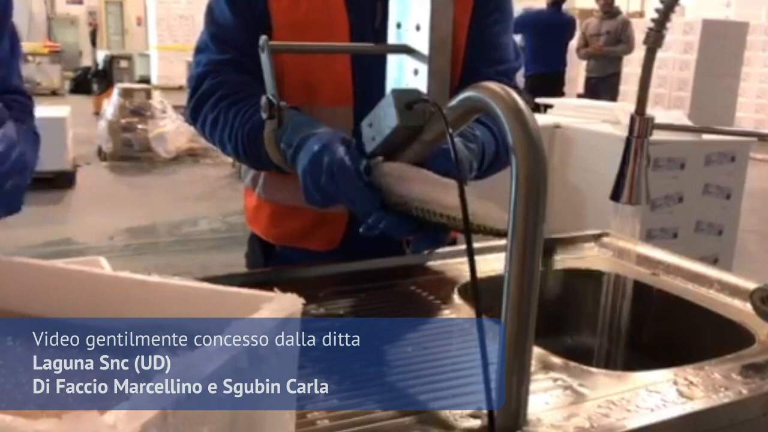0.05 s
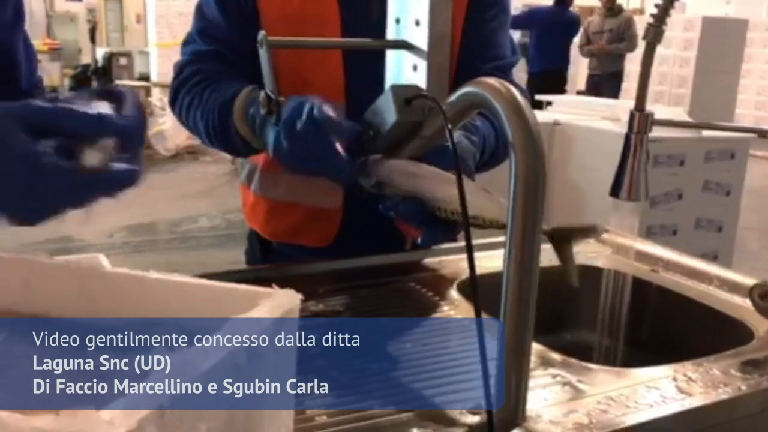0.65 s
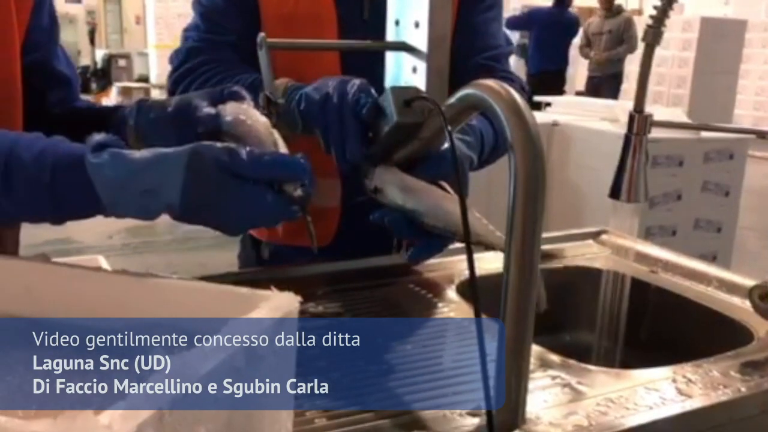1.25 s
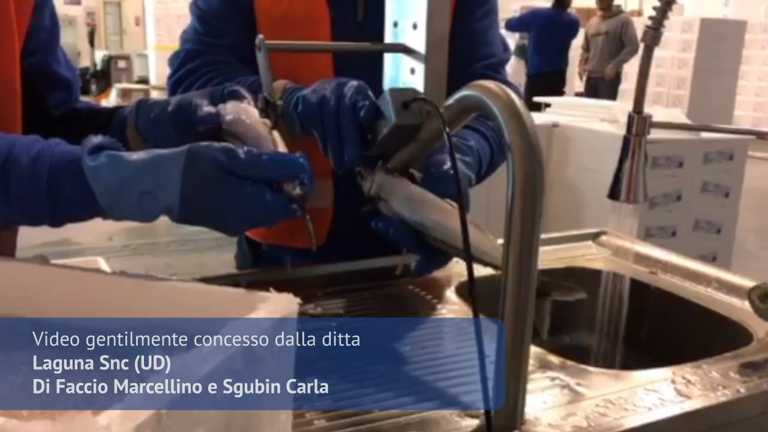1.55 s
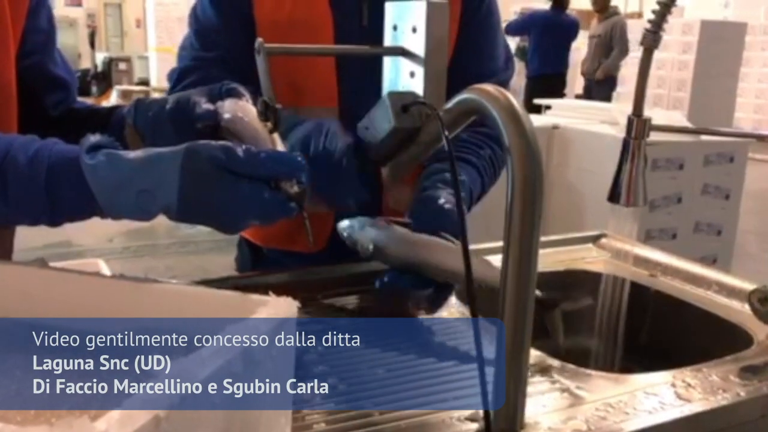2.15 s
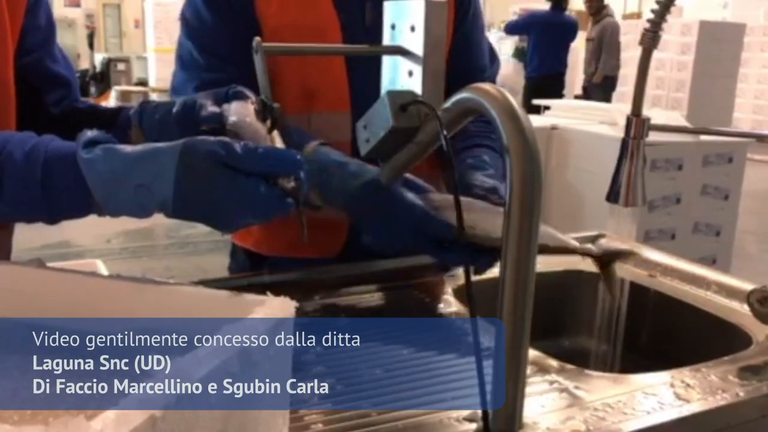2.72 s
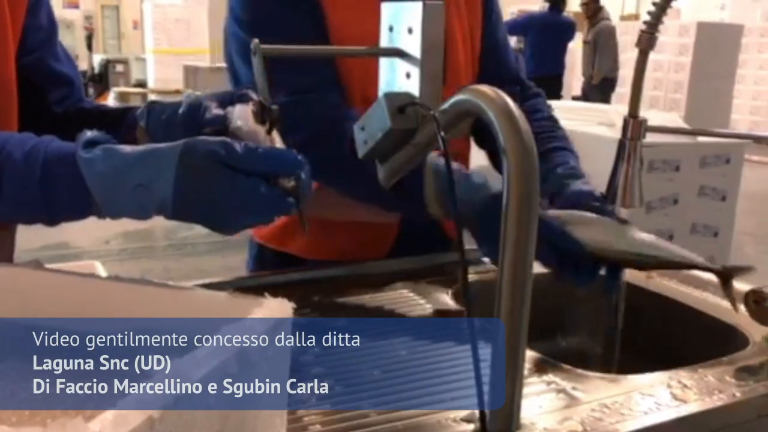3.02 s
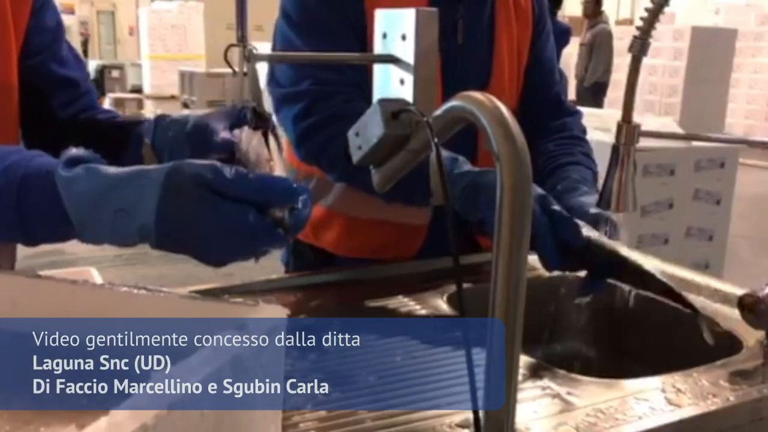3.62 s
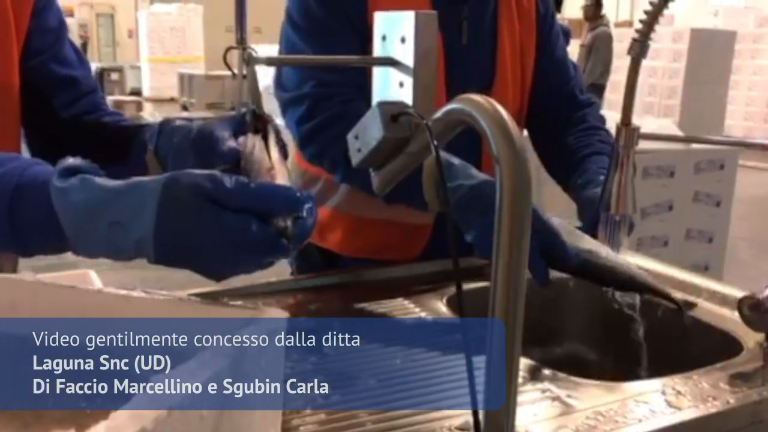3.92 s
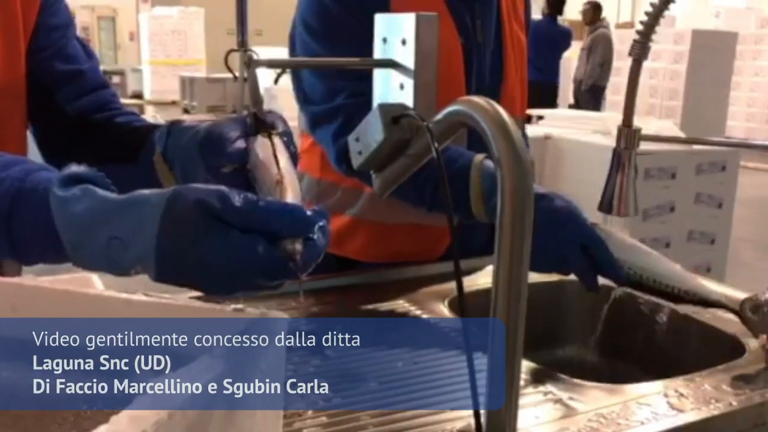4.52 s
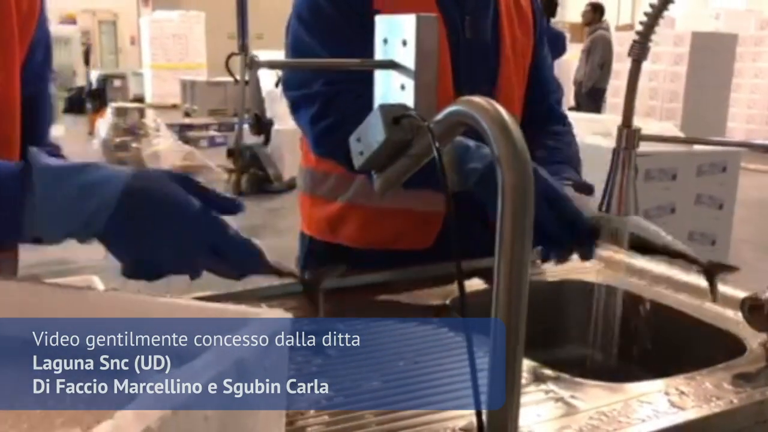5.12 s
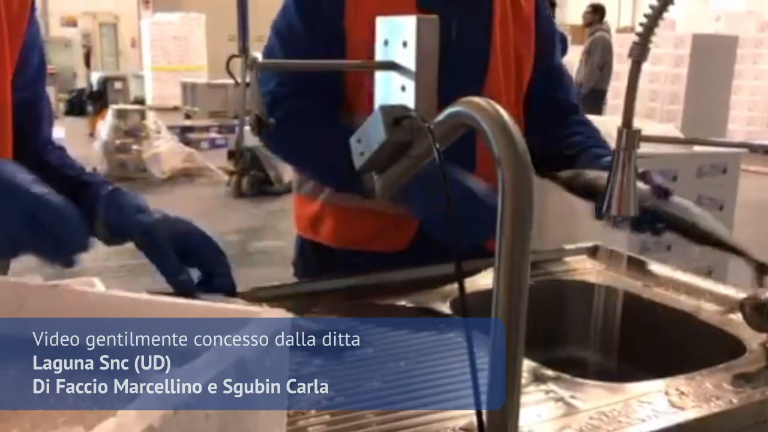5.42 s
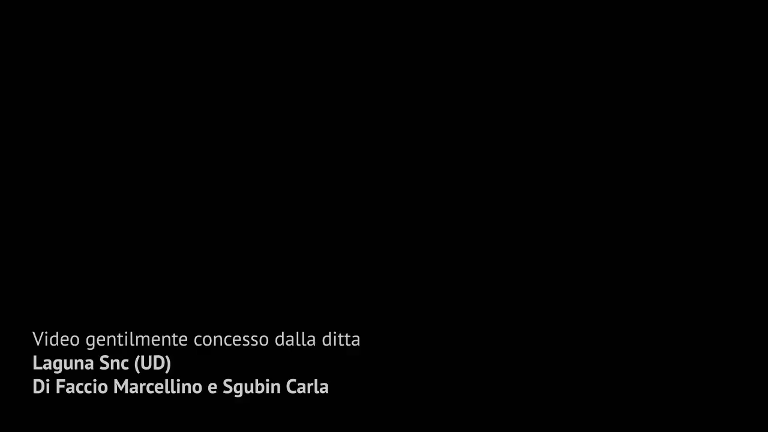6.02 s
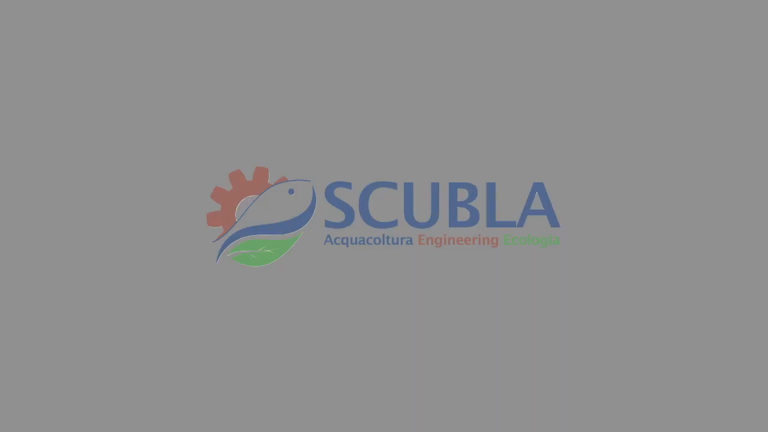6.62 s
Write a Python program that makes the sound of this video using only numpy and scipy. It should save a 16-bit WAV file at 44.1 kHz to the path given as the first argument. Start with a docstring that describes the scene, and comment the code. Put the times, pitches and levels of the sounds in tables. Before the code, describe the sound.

A suction machine slurps and gurgles as it pulls the guts from a fish, with small wet snaps over a motor hum. The pipe blocks and air squeals briefly, then it clears with a wet pop and a knock. The machine settles into a steady whine over rushing air while tap water splashes and fades. Near the end a fish thuds softly on a steel bench, all heard nearby in a droning workshop.

```python
"""A vacuum fish-gutting machine

At a steel sink in a droning workshop, a nozzle slurps the guts out of a fish until a plug of them
blocks the pipe: air squeals past it and the unloaded turbine speeds up. The plug clears with a wet pop,
the turbine settles to a whine over rushing air and a running tap, and another fish thuds on the bench."""
import sys
import numpy as np
from scipy import signal
from scipy.fft import rfft, irfft, next_fast_len
from scipy.io import wavfile
from scipy.ndimage import uniform_filter1d, map_coordinates

SR = 44100
rng = np.random.default_rng(int(sys.argv[2]) if len(sys.argv) > 2 else 0)


def master(y):
    """Save y as 16-bit WAV."""
    cut = np.clip(np.atleast_2d(y).T, -1, 1)
    pcm = np.round(cut * 32767)  # scale
    wavfile.write(sys.argv[1], SR, pcm.astype(np.int16))


N = 298116

# Spectrum of the workshop drone: f/Hz, relative density/dB
DRONE_SPECTRUM = [(25, -33.5), (50, -9.5), (100, -9.5), (135, -7.5), (215, -0.5), (300, 2), (430, -5),
                  (620, -3), (1200, -8), (3000, -4.5), (8000, -30)]
# Reverberation time of the workshop: f/Hz, T60/s
ROOM_T60 = [(60, 0.38), (150, 1), (1000, 0.48), (10000, 0.077)]
# Soft, heavy blows on the steel bench: t/s, level/dB
THUDS = [(2.135, -24), (5.468, -23.5)]
# Modes of the bench: f/Hz, relative level/dB, T60/s, swell time/s
BENCH_MODES = [(72, -7, .12, .045), (199.2, 1.5, 0.19, .018), (256, -3, 0.2, .03)]
# Spectrum of the rushing air: f/Hz, relative density/dB
AIR_SPECTRUM = [(250, -16.5), (450, -9.5), (900, 2.5), (1500, 0.5), (2300, -5.5), (4600, 2.5), (5700, 1),
                (6300, -2.5), (7800, -7.5), (9000, -5.5), (10000, -7), (11400, -6.5), (13000, -7),
                (15800, -11)]
# Resonances of the suction pipe: f/Hz, bandwidth/Hz, relative level/dB
PIPE_MODES = [(604, 47, -1), (1053, 98, -3), (2910, 690, -16.5), (3123, 94, -3), (3955, 450, -8),
              (4470, 130, -4), (5404, 150, -4.5)]
# Rotation rate of the turbine under load: t/s, f/Hz
LOADED_SPEED = [(0, 336.5), (.5, 338.4), (.9, 334.6), (1.32, 329.2), (3, 327.4), (3.4, 327.8), (3.9, 327.5),
                (4.7, 326.4), (5.2, 324.9), (5.6, 325.6), (6.09, 325.3)]
# Scraps and drops snapping, and a last dry tick of handling: t/s, level/dB, relative level of the dull part/dB
SNAPS = [(.1174, -12, 0), (0.8886, -10, -9), (.914, -7, -15), (.9734, -6, -19.5), (1.1922, -9.5, -6),
         (1.3426, -13, -15), (2.1708, -3.5, -15.5), (6.069, -5, -38)]
# Filter for the bright part of a snap: f/Hz, gain/dB
CRACK_RESPONSE = [(800, -34), (3500, -4), (6000, 0), (7500, -6.5), (15000, -7.5)]
# The plug knocking down the pipe: t/s, level/dB, f/Hz, T60/s
PLUG_KNOCKS = [(2.160, -8, 750, 0.022), (2.163, -16, 158, 0.052), (2.176, -23.5, 598, 0.16),
               (2.183, -25.5, 68, .15), (2.204, -10.5, 246, 0.033)]
# Leaks past the plug: t/s, duration/s, first f/Hz, last f/Hz, level/dB, roughness, overtone weight
SQUEALS = [(1.335, .04, 2800, 3080, -33.5, 0.7, 0.2), (1.462, 0.0415, 2550, 2214, -34, .5, 0.88),
           (1.495, .075, 1760, 1506, -29, 0.2, 0.58), (1.55, 0.12, 1540, 1643, -36, 1.1, .85),
           (1.675, 0.044, 3000, 3260, -34, .4, 0), (1.69, .35, 1626, 1690, -35.5, .03, 0.1)]
# Gaps ringing between flesh and nozzle: peak t/s, duration/s, f/Hz, bandwidth/Hz, level/dB
SQUELCHES = [(.008, 0.054, 6070, 380, -30.5), (.03, 0.065, 580, 60, -36), (.18, 0.12, 1960, 1050, -29.5),
             (0.474, 0.048, 180, 50, -34.5), (.64, 0.15, 8650, 1300, -37), (0.67, 0.086, 4630, 650, -33),
             (0.69, 0.14, 1290, 400, -33), (.9, 0.11, 5930, 950, -28.5), (1.61, .07, 4470, 800, -34.5),
             (1.628, 0.02, 9000, 1600, -26.5), (1.93, 0.43, 3190, 600, -44.5)]
# Spectra of the three kinds of wet flow: f/Hz, relative density/dB
GURGLE_SPECTRUM = [(60, -17), (180, 4), (330, -8), (550, -3), (1100, 1), (2200, -1), (3200, -4),
                   (4500, -13), (7000, -15.5), (15000, -29)]
SPRAY_SPECTRUM = [(300, -25.5), (750, -10), (1080, 4), (1500, 0), (3000, -4), (3750, -0.5), (4700, -3.5),
                  (5400, 0), (6400, 0.5), (6900, -7), (9600, -6.5), (11000, -17), (15800, -14.5)]
HISS_SPECTRUM = [(1500, -8), (4400, -2), (6500, -3), (8000, 0.5), (9300, 1), (11000, 0), (12600, 1.5),
                 (15800, -4)]
# Wet surges: t/s at full strength, rise constant/s, hold/s, fall constant/s, gurgle/dB, spray/dB, hiss/dB
SURGES = [(0, .01, 1.32, 0.03, -37, -34, -31.5), (0.118, .018, 0.13, 0.27, -27.5, -48, -38),
          (0.904, .3, 0.4, 0.006, -37.5, -25, -37.5), (1.318, .008, .004, 0.0029, -26, -19.5, -31.5),
          (1.628, 0.097, .005, 0.11, -42, -39, -24.5), (2.134, .005, 0.036, 0.044, -36.5, -50.5, -28.5),
          (2.165, .013, .018, 0.034, -28, -37.5, -30)]

BLOCK_S, CLEAR_S = 1.33, 2.37  # the pipe is plugged; air flows freely again
SLIP_S, RELOAD_S = 2.13, 2.23  # the plug moves; the turbine's load returns


def amp(db):
    """Amplitude ratio of a level in decibels."""
    return 10 ** (np.asarray(db) / 20)


def unit(x):
    """Normalisation to rms 1."""
    return x / np.sqrt(np.mean(x ** 2) + 1e-20)


def along(points, hz):
    """Interpolation of (f/Hz, value) points on a logarithmic frequency axis."""
    f, v = np.transpose(points)
    return np.interp(np.log(hz + 1), np.log(f + 1), v)


def clock():
    """Sample times in seconds."""
    return np.arange(N) / SR


def swell(start, rise, hold, fall):
    """Envelope with exponential growth up to start, a hold and exponential decay."""
    t = clock() - start
    return np.exp(np.minimum(t, 0) / rise - np.maximum(t - hold, 0) / fall)


def step(x):
    """Smooth transition from 0 to 1 around x = 0."""
    return .5 + .5 * np.tanh(x)


def wobble(rate):
    """Random modulation: a spline through rate Gaussian values a second."""
    return map_coordinates(rng.standard_normal(int(N * rate / SR) + 4), [clock() * rate])


def filtered(x, response):
    """Linear filtering: the spectrum of x times a frequency response."""
    m = next_fast_len(N + SR // 2)
    return irfft(rfft(x, m) * response(np.fft.rfftfreq(m, 1 / SR)), m)[:N]


def shaped(x, spectrum):
    """Spectral shaping by (f/Hz, gain/dB) points."""
    return filtered(x, lambda hz: amp(along(spectrum, hz)))


def add(track, s, sound):
    """Superposition of a sound on a track at time s."""
    part = track[round(s * SR):][:len(sound)]
    part += sound[:len(part)]


def turbulence(patchy_db):
    """White noise whose level fluctuates in patches of time and frequency."""
    spectra = signal.stft(rng.standard_normal(N), nperseg=512)[2]
    patches = uniform_filter1d(rng.standard_normal(spectra.shape), size=5, axis=0)
    patches = unit(uniform_filter1d(patches, size=12, axis=1))
    return unit(signal.istft(spectra * amp(patchy_db * patches), nperseg=512)[1][:N])


def wet_flow(spectrum, drops_per_s, drops_db, sputter_db):
    """Two-phase flow: slugs of liquid modulate turbulent air, and bursting droplets add shot noise."""
    drops = (rng.random(N) < drops_per_s / SR) * rng.uniform(-1, 1, N)
    flow = turbulence(patchy_db=2.5) + amp(drops_db) * unit(drops)
    return unit(shaped(flow, spectrum) * amp(sputter_db * np.tanh(wobble(190))))


def soft_ring(hz, t, splat_db):
    """A mode under a soft blow: a sinusoid blurred by an octave of noise."""
    band = signal.butter(2, [0.74 * hz, 1.5 * hz], "bandpass", fs=SR, output="sos")
    splat = unit(signal.sosfilt(band, rng.standard_normal(len(t))))
    return np.sin(2 * np.pi * hz * t) + amp(splat_db) * splat


def workshop_drone():
    """Ambient noise: a low, broad spectrum under slow amplitude modulation."""
    return amp(-37.5 + .5 * wobble(2.7)) * unit(shaped(turbulence(patchy_db=1), DRONE_SPECTRUM))


def reverberation(x):
    """Convolution with the workshop's diffuse impulse response, which decays fastest in the treble."""
    hz, t, spectra = signal.stft(rng.standard_normal(SR // 2), SR, nperseg=256)
    decay = amp(-60 * t / along(ROOM_T60, hz)[:, None])
    tail = signal.istft(spectra * decay, SR, nperseg=256)[1]
    return signal.fftconvolve(x, tail / np.linalg.norm(tail))[:N]


def tap():
    """Splash noise: water fizzes in the sink as the fish is brought under the tap, then slowly fades."""
    t, fade_db_per_s = clock() - CLEAR_S, 7.5
    envelope = amp(-38.5 - fade_db_per_s * t) * step(t / 0.32)
    return envelope * wet_flow(HISS_SPECTRUM, drops_per_s=2100, drops_db=-8, sputter_db=2.2)


def bench_thuds():
    """Modal response of the bench: as a limp weight settles, each mode swells and decays."""
    out, t = np.zeros(N), np.arange(SR // 2) / SR
    for s, db in THUDS:
        for hz, mode_db, t60, swell_s in BENCH_MODES:
            attack = np.minimum(t / swell_s, 1) ** 2
            decay = amp(db + mode_db - 60 * np.maximum(t - swell_s, 0) / t60)
            add(out, s, attack * decay * soft_ring(hz, t, splat_db=-6.5))
    return out


def airflow():
    """Turbulent inflow excites the pipe's resonances; guts throttle it and the plug briefly chokes it."""
    def pipe_response(f):
        return sum((-1) ** k * amp(db) * 1j * f * width / (hz * hz - f * f + 1j * f * width)
                   for k, (hz, width, db) in enumerate(PIPE_MODES))

    throttled = step((CLEAR_S - clock()) / 0.023)
    choked = swell(BLOCK_S, rise=.05, hold=.05, fall=0.087)  # until the vacuum builds
    hollow = unit(filtered(rng.standard_normal(N), pipe_response))
    flow_db = -37 - 2 * throttled - 3.5 * choked + .16 * wobble(11)
    rush = unit(shaped(turbulence(patchy_db=1.37), AIR_SPECTRUM))
    return amp(flow_db) * (rush + amp(-3.5) * hollow)


def turbine():
    """Rotor tones: a hum at the shaft rate and a blade-passing whine, rising as blockage sheds the load."""
    t = clock()
    blades, idle_hz, race_hz, hum_limit_hz = 6, 326.5, 46.9, 355.3
    spin_up = 1 - np.exp(-np.maximum(np.minimum(t, RELOAD_S) - BLOCK_S, 0) / .37)
    spin_down = np.exp(-np.maximum(t - RELOAD_S, 0) / .28)
    shaft_hz = np.interp(t, *np.transpose(LOADED_SPEED)) + race_hz * spin_up * spin_down
    angle = 2 * np.pi * np.cumsum(shaft_hz * (1 + .0005 * wobble(14))) / SR

    def harmonic(order, waver):
        """Eddies modulate each harmonic in amplitude and phase."""
        eddies = 1 + waver * (wobble(16) + 1j * wobble(16))
        return np.sqrt(2) * np.real(np.exp(1j * order * angle) * eddies)

    def smothered(until):
        """Attenuation by the moving plug."""
        return amp(-11.5 * swell(SLIP_S, rise=.02, hold=until - SLIP_S, fall=.006))

    hum_db = -41 - 8.5 * step((shaft_hz - hum_limit_hz) / 4)
    hum = amp(hum_db) * harmonic(1, waver=0.099)
    muffled = np.exp(-np.maximum(t - CLEAR_S, 0) / 0.51)  # eases as the guts drain
    flare = np.exp(-((t - 2.42) / .042) ** 2)  # the first gulp of air
    whine_db = -35.5 + 0.4017 * (shaft_hz - idle_hz) - 22.5 * muffled + 10.5 * flare
    whine = (harmonic(blades, waver=0.056)
             + amp(-12) * harmonic(2 * blades, waver=0.19)
             + amp(-13.5) * harmonic(2, waver=0.25))
    return hum * smothered(until=CLEAR_S + 0.083) + amp(whine_db) * whine * smothered(until=CLEAR_S)


def snaps():
    """Broadband transients: each snapping scrap or drop gives a wet crack, and the last one is a dry handling
    tick, each with a bright and a dull part."""
    bright, dull, t = np.zeros(N), np.zeros(N), np.arange(SR // 16) / SR
    attack_s, t60 = .0006, .045
    for s, db, dull_db in SNAPS:
        envelope = amp(db - 7 - 60 * t / t60) * (1 - np.exp(-t / attack_s))
        burst = envelope * rng.standard_normal(len(t))
        add(bright, s, burst)
        add(dull, s, burst * amp(dull_db))
    return shaped(bright, CRACK_RESPONSE) + shaped(dull, GURGLE_SPECTRUM)


def plug_knocks():
    """Damped oscillation of the pipe struck by the plug: the lower the pitch, the slower the attack."""
    out, t = np.zeros(N), np.arange(SR // 3) / SR
    for s, db, hz, t60 in PLUG_KNOCKS:
        attack = 1 - np.exp(-t * hz / .32)
        add(out, s, attack * amp(db - 60 * t / t60) * soft_ring(hz, t, splat_db=-4))
    return out


def squeals():
    """Flow-induced oscillation: leaks past the plug whistle, ragged as flesh flutters, pure once taut."""
    out = np.zeros(N)
    flutter = .045 * wobble(600) + .025 * wobble(90)
    shake_db = 4 * np.tanh(wobble(80))
    for s, length, first_hz, last_hz, db, rough, overtones in SQUEALS:
        progress = (clock() - s) / length
        on = (progress > 0) & (progress < 1)
        pitch_hz = first_hz * (last_hz / first_hz) ** progress[on] * (1 + rough * flutter[on])
        angle = 2 * np.pi * np.cumsum(pitch_hz) / SR
        rolloff = np.clip(overtones, 1e-3, 1)
        tone = sum(rolloff ** np.log2(k) * k ** -.3 * np.sin(k * angle) for k in np.arange(1, 7))
        out[on] += amp(db + rough * shake_db[on]) * np.sin(np.pi * progress[on]) * tone
    return out


def squelches():
    """Resonance of air in each passing gap: a band of noise that swells and dies."""
    out = np.zeros(N)
    for s, length, hz, width_hz, db in SQUELCHES:
        band = filtered(rng.standard_normal(N), lambda f: 1 / (1 + (2 * (f - hz) / width_hz) ** 4))
        out += amp(db) * np.exp(-2 * ((clock() - s) / length) ** 2) * unit(band)
    return out


def slurp():
    """Incoherent surges add in power: guts gurgle up the pipe, water tears into spray and gaps hiss."""
    power = sum(np.outer(amp(levels_db), swell(s, rise, hold, fall)) ** 2
                for s, rise, hold, fall, *levels_db in SURGES)
    gurgle, spray, hiss = np.sqrt(power)
    flow = (gurgle * wet_flow(GURGLE_SPECTRUM, drops_per_s=500, drops_db=-3.5, sputter_db=1.5)
            + spray * wet_flow(SPRAY_SPECTRUM, drops_per_s=1500, drops_db=-7, sputter_db=3.1)
            + hiss * wet_flow(HISS_SPECTRUM, drops_per_s=3100, drops_db=-7, sputter_db=2))
    return flow * amp(0.93 * np.tanh(wobble(65)))


def scene():
    """Superposition of the direct sound and the reverberation of blows and wet flow, alike in both ears."""
    blows = plug_knocks() + bench_thuds() + snaps()
    wet = slurp() + squelches() + squeals()
    direct = workshop_drone() + turbine() + airflow() + tap() + wet + blows
    mono = direct + reverberation(amp(-11.5) * blows + amp(-12) * wet)
    return np.array([mono, mono])


def record(dry):
    """Band limiting: the microphone sheds deep bass and dips in the high treble; the sound stops short."""
    end_s, top_hz = 6.091, 15900
    gate = np.clip((end_s - clock()) / .003, 0, 1)
    lean = signal.sosfilt(signal.butter(3, 42, "highpass", fs=SR, output="sos"), dry)
    dip = lambda hz: amp(-5.5 * np.exp(-((hz - 10480) / 380) ** 2))
    low_pass = lambda hz: step((top_hz - hz) / 60)
    return np.array([filtered(side * gate, lambda hz: dip(hz) * low_pass(hz)) for side in lean])


dry = scene()
out = record(dry)
master(out)
```